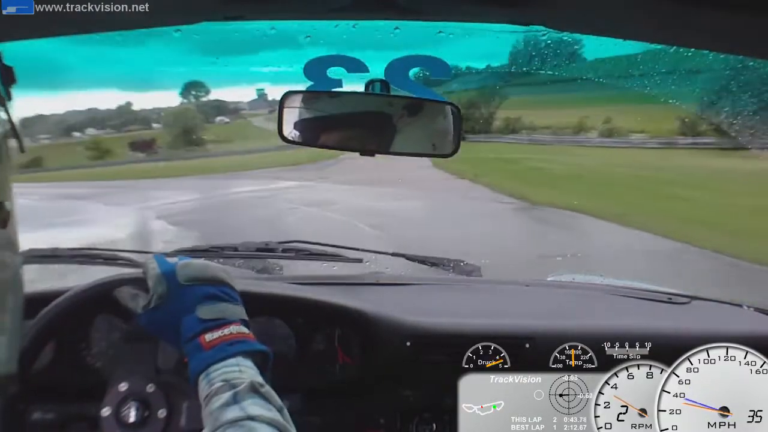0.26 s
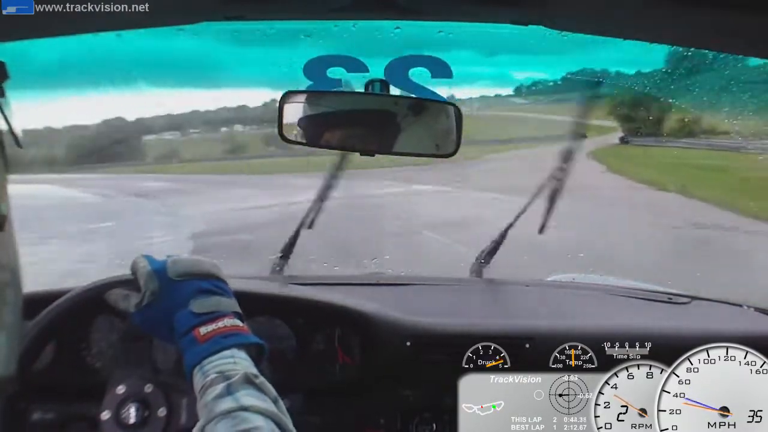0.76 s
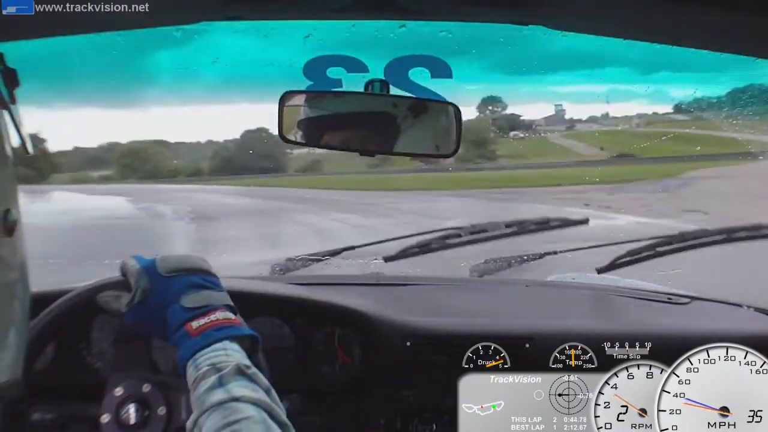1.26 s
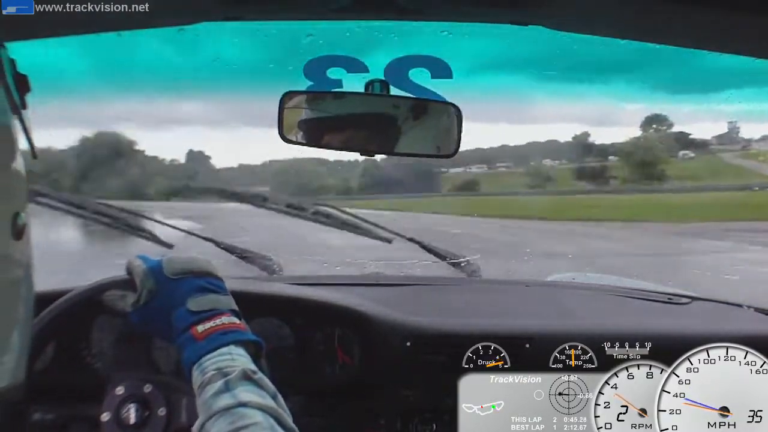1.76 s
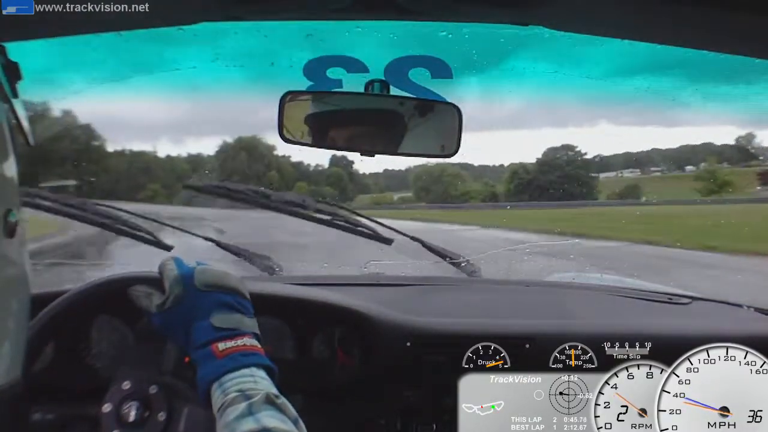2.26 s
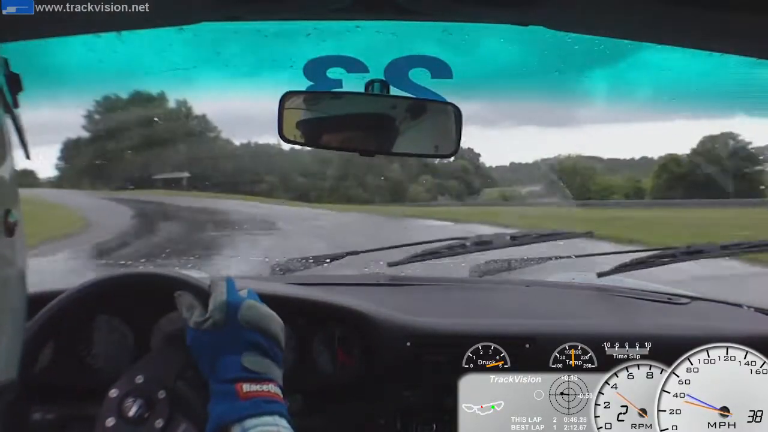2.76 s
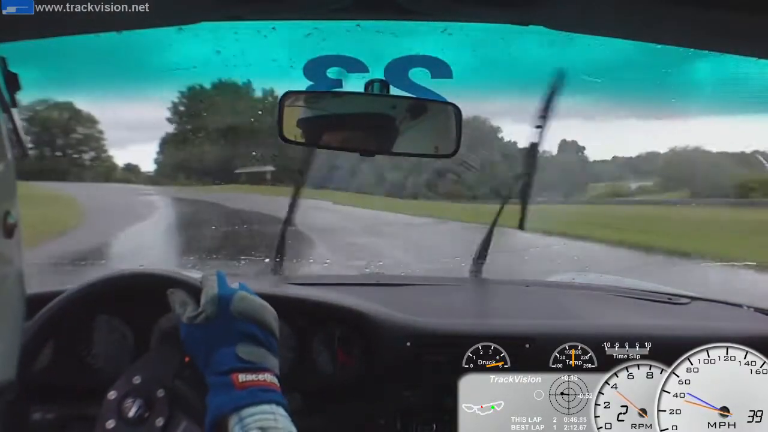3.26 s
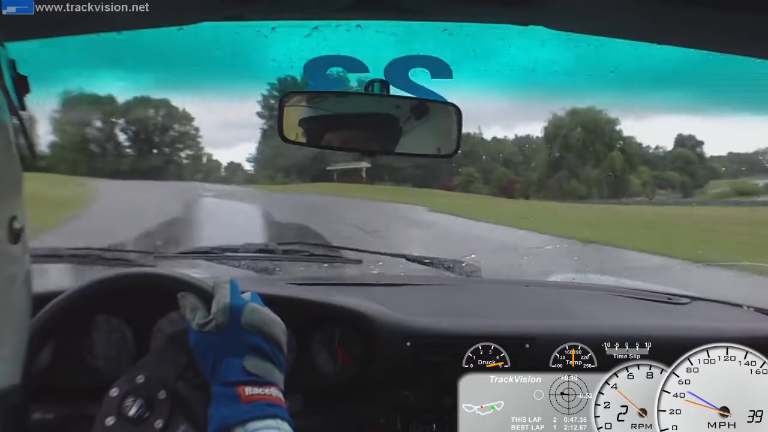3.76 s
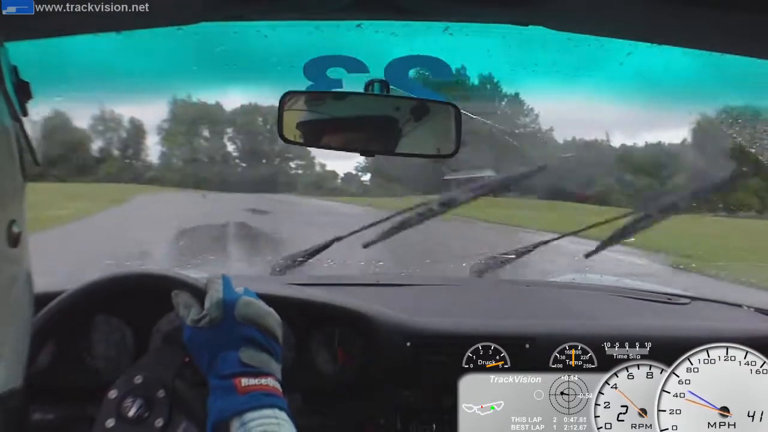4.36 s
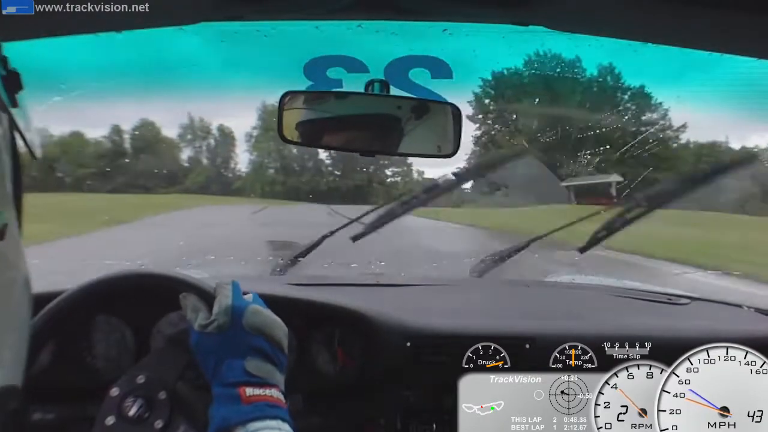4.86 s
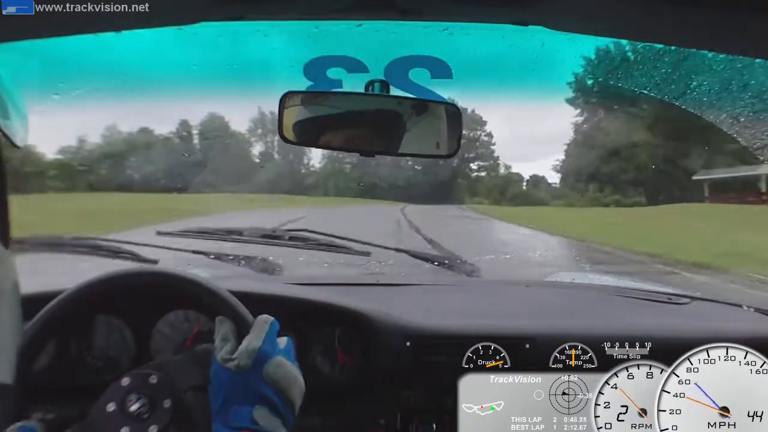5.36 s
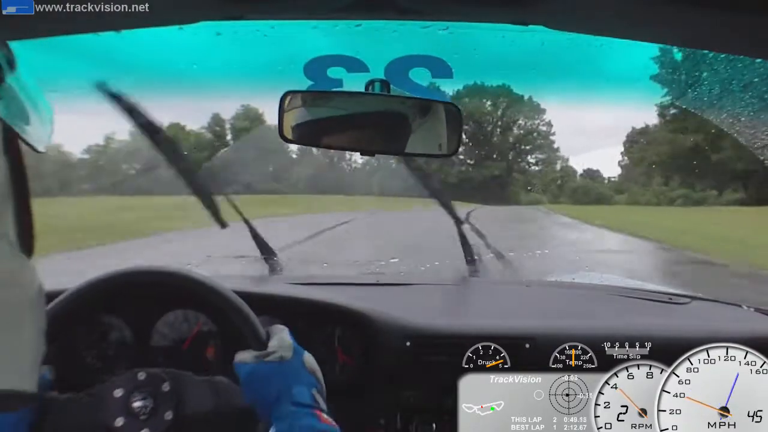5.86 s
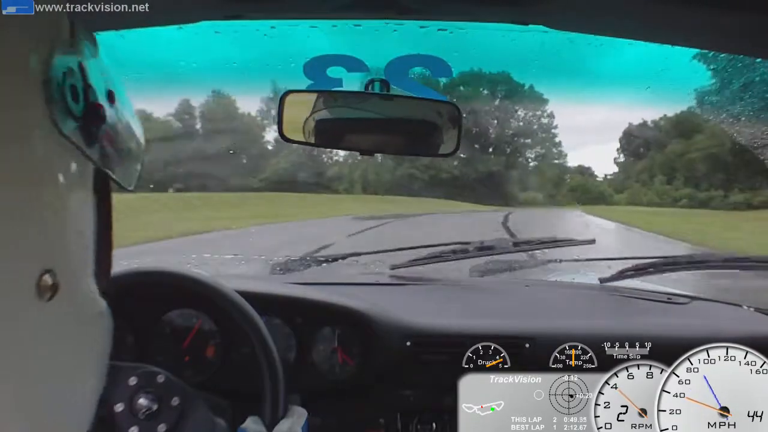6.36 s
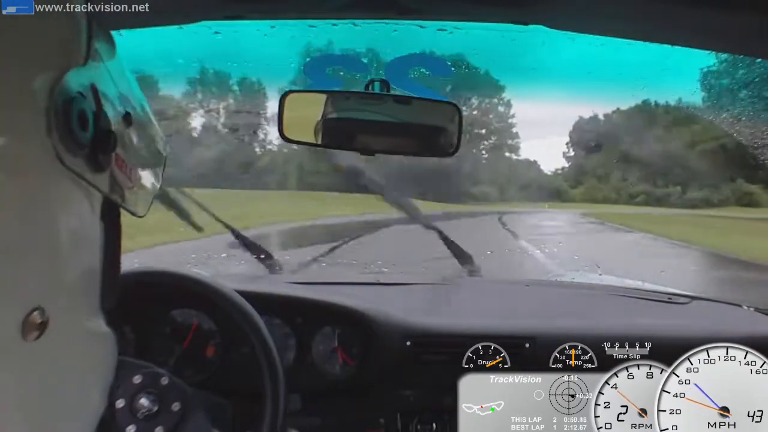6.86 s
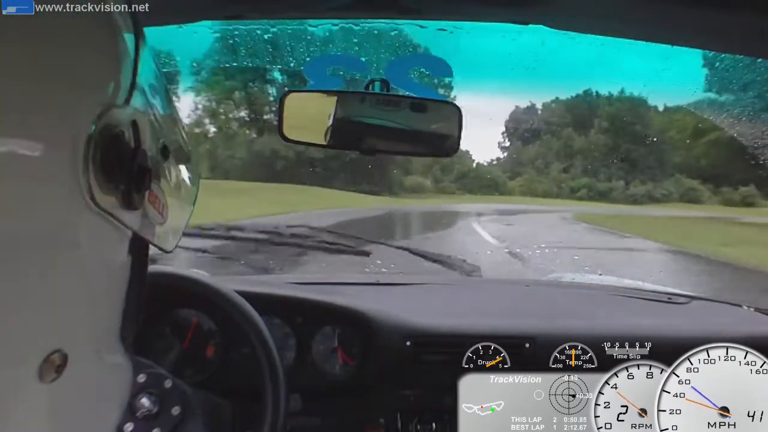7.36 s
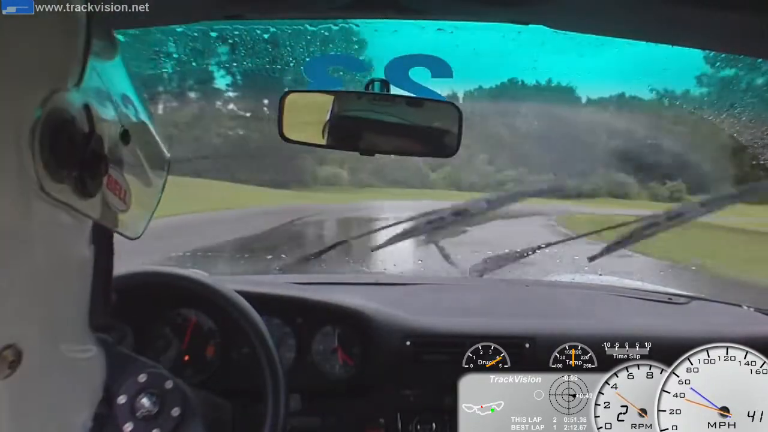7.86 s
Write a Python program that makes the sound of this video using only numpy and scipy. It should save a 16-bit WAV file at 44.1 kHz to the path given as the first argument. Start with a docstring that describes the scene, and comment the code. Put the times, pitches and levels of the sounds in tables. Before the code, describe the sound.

A six-cylinder sports car engine drones and growls behind the seats, heard from inside a bare cabin on a wet track. It rises slowly in pitch for over five seconds, rasps briefly under full throttle, then sinks as the driver lifts off. A gear whine follows the revs. Tyre roar, low rumble and spray hiss swell with each bump, among rattling trim, dull knocks and sharp ticks.

```python
"""A six-cylinder engine drones and growls behind the seats of a bare cabin on a wet, bumpy track.
Its orders, harmonics of the crank rotation, force the body shell and swell as they cross its
resonances; a gear whines on order 28. Tyre roar, spray and loose trim rise with the jolts of
the car, among sharp ticks, dull knocks and one squeak."""
import sys
import numpy as np
from scipy import signal
from scipy.io import wavfile
from scipy.ndimage import uniform_filter1d

SR = 44100
rng = np.random.default_rng(int(sys.argv[2]) if len(sys.argv) > 2 else 0)


def to_wav(s):
    """Save 16-bit WAV."""
    ch = np.atleast_2d(s).T  # columns
    pcm = np.round(np.clip(ch, -1, 1) * 32767)  # PCM
    wavfile.write(sys.argv[1], SR, pcm.astype(np.int16))


N = 358533

# Each row: order, then its level in dB when coasting, at half throttle and wide open.
ORDER_LEVELS = [(2.0, -48.5, -70, -56.5), (4.0, -40.5, -64.5, -55), (5.0, -54.5, -51.5, -60),
                (6.0, -63, -47, -47.5), (7.0, -48, -48, -86.5), (8.0, -63.5, -63, -52.5),
                (9.0, -46.5, -49, -43.5), (10.0, -55.5, -54.5, -74), (11.0, -56.5, -48, -84),
                (12.0, -42.5, -57.5, -38.5), (13.0, -51, -56, -57), (14.0, -55.5, -51.5, -51),
                (15.0, -55.5, -46.5, -77.5), (16.0, -72, -52.5, -45), (17.0, -65.5, -48.5, -43),
                (18.0, -53.5, -59, -69), (19.0, -63.5, -50, -59.5), (20.0, -55, -54, -53.5),
                (21.0, -58, -49.5, -61.5), (22.0, -51, -48.5, -76), (23.0, -65, -54, -46),
                (24.0, -53.5, -63, -57), (25.0, -78, -54, -55.5), (26.0, -82, -55.5, -48),
                (27.0, -60.5, -50, -55.5), (29.0, -83.5, -55.5, -58), (30.0, -52.5, -49, -51),
                (31.0, -59, -60, -58), (32.0, -59.5, -57.5, -50.6), (33.0, -61, -65, -78),
                (34.0, -68, -48, -67), (35.0, -65.5, -54.5, -74.5), (36.0, -60.5, -56.5, -49),
                (37.0, -57.5, -67, -55), (38.0, -67.5, -60, -71.5), (39.0, -83, -61.5, -83),
                (40.0, -60.5, -64, -64), (41.0, -81, -61, -53.5), (42.0, -60, -59.5, -59),
                (43.0, -68, -63, -56), (44.0, -66.5, -60.5, -70.5), (45.0, -70, -62, -49),
                (46.0, -69.5, -66.5, -54.5), (47.0, -68, -57, -60.5), (48.0, -56, -73, -51),
                (49.0, -58, -57.5, -48.5), (50.0, -58, -62, -78), (51.0, -66, -67, -60.5),
                (52.0, -62.5, -67.5, -80.5), (53.0, -56.5, -71, -62.5), (54.0, -78, -59.5, -73),
                (55.0, -63, -61.5, -72), (56.0, -60.5, -64.5, -61.5)]
# Each row: time in seconds, extra level of the growl orders in dB.
GROWL_BOOST = [(2.2, -3), (3.0, 0), (3.6, 2), (3.9, 2.5), (4.4, -3.5), (4.8, -3), (4.93, 1), (5.2, 2),
               (5.45, -2), (5.7, 3.5), (5.9, 3), (6.1, 1)]

def crank_orders(hz, angle, throttle, in_step, unsteadiness):
    """Superposition: in step, the growl orders pulse once a turn and the rasp orders twice."""
    count = len(ORDER_LEVELS)
    phases = rng.uniform(-np.pi, np.pi, count)
    swings, lags = drift(1.9, count), drift(12, count)
    boost = gain_of(columns(GROWL_BOOST)[0])
    rasp_turns = np.array([0.41, 0.75])  # the two firings between growl pulses
    hum, upper = np.zeros(N), np.zeros(N)
    for (order, *levels_db), phase, swing, lag in zip(ORDER_LEVELS, phases, swings, lags):
        growls, rasps = 13 <= order <= 19, 22 <= order <= 27
        level_db = np.interp(throttle, (0, 0.5, 1), levels_db) + 0.66 * unsteadiness * swing
        level = gain_of(level_db) * boost ** growls * shell_along(order * hz)
        rasp_phase = rasps * np.angle(np.exp(-2j * np.pi * order * rasp_turns).sum())
        loose = 1 - in_step * (0.97 * growls + 0.85 * rasps)
        tone = level * np.sin(order * angle + loose * (phase + 0.13 * lag) + rasp_phase)
        if order < 13:
            hum += tone
        else:
            upper += tone
    return hum, upper


# Each row: time in seconds, crank speed in turns a second.
CRANK_SPEED = [(0.0, 27.8), (0.3, 28.16), (0.6, 28.68), (1.0, 29.33), (1.4, 29.82), (1.7, 30.16),
               (2.0, 30.77), (2.4, 31.67), (2.8, 32.37), (3.2, 33.07), (3.6, 33.79), (4.0, 34.55),
               (4.3, 35.22), (4.6, 35.82), (4.85, 36.21), (5.1, 36.98), (5.3, 37.32), (5.5, 37.46),
               (5.7, 37.41), (5.85, 37.24), (6.0, 37.24), (6.15, 36.55), (6.3, 36.14), (6.5, 35.69),
               (6.8, 34.71), (7.1, 33.78), (7.4, 33.05), (7.7, 32.35), (7.9, 32.28), (8.13, 31.4)]
# Each row: time in seconds, gain of the orders in dB, throttle from 0 to 1, firing boom in dB.
ENGINE_LOAD = [(0.0, -13.5, 0, -67), (0.5, -7.5, 0.0, -58), (1.0, -1, 0.49, -51.5), (1.3, -2, 0.5, -73),
               (1.5, -0.8, 0.47, -46.5), (2.2, -2.5, 0.34, -46.0), (2.9, -3, 0.51, -45.5),
               (3.3, -2.5, 0.36, -46), (3.7, 3, 0.28, -46.5), (4.05, 3, 0.17, -47.0), (4.4, 1.5, 0.27, -46),
               (4.8, 1.2, 0.73, -46), (4.92, 0.5, 0.54, -46.5), (5.3, 3.5, 0.62, -46.5),
               (5.75, 0.5, 0.92, -53.5), (6.0, -4, 1.0, -50), (6.2, 3, 0.09, -45), (6.55, -4, 0.22, -44),
               (7.0, -3.5, 0.1, -44.5), (7.3, -5.5, 0.02, -44.5), (7.5, -1.5, 0.07, -51.5),
               (8.13, -1, 0.17, -62)]

def engine(jolt_db):
    """Forced vibration: three firings a turn drive the shell through the engine mounts."""
    hz, = columns(CRANK_SPEED)
    load_db, throttle, boom_db = columns(ENGINE_LOAD)
    angle = 2 * np.pi * (0.5 + np.cumsum(hz) / SR)
    in_step = np.interp(hz, (35.8, 36.4), (0, 1)) * np.minimum(2 * throttle, 1)  # pulling at high revs
    unsteadiness = 1.5 - 0.59 * in_step
    hum, upper = crank_orders(hz, angle, throttle, in_step, unsteadiness)
    whine = gear_whine(hz, angle)
    boom_swing, burn_swing = drift(19, count=2)
    boom = gain_of(boom_db + 2.2 * boom_swing) * np.sin(3 * angle)
    # a four-stroke repeats every second turn, and no two burns are alike
    upper *= 1 + (0.14 + 0.043 * in_step) * np.cos(angle / 2)
    upper *= gain_of(0.69 * unsteadiness * burn_swing)
    # jolts press the mounts, so more gets through; hum and whine feel it less
    shake = gain_of(0.79 * (jolt_db - uniform_filter1d(jolt_db, size=SR // 2)))
    orders = gain_of(load_db) * (upper * shake + hum * shake ** 0.86)
    return np.sqrt(2) * (orders + whine * np.sqrt(shake) + boom)


# Each row: time in seconds, whine level fed into the shell in dB.
TOOTH_LOAD = [(0.0, -46), (0.4, -51), (0.58, -46), (0.75, -40.5), (1.1, -44), (1.6, -40.5), (2.0, -42),
              (2.35, -45), (2.6, -48.5), (2.85, -48), (3.1, -44.5), (3.3, -46), (3.5, -48.5), (3.9, -49),
              (4.2, -52.5), (4.5, -52), (4.8, -52), (5.1, -42), (5.4, -45), (5.75, -45), (6.0, -46),
              (6.3, -60), (6.6, -48), (6.9, -50), (7.2, -45), (7.5, -58), (7.8, -58), (8.13, -43)]

def gear_whine(hz, angle, order=28):
    """Gear meshing: periodic tooth contact gives a tone, louder as the teeth bear harder."""
    swing, lag = drift(19, count=2)
    level = gain_of(columns(TOOTH_LOAD)[0] + 1.2 * swing) * shell_along(order * hz)
    return level * np.sin(order * angle + 0.15 * lag)


# Each row: resonance frequency in Hz, width in Hz, peak gain in dB.
SHELL_MODES = [(123.7, 11, -1), (214, 15.8, -1), (319.7, 50, -1.6), (458, 13, 1), (513, 56, 0.7),
               (560.8, 17.8, 9.5), (584.6, 13, -1.5), (603.4, 12, 8), (621.4, 33, 5), (668.2, 33, 10),
               (697.6, 24, 3.5), (751, 55, 0.5), (828.4, 41, 0.5), (884.3, 64, 6), (931.5, 16, 7.5),
               (970.6, 34.7, 10), (1035, 86, 2.5), (1177, 77, 2), (1290, 56, 0), (1346, 27, 7),
               (1394, 57, 8.5), (1493, 41, 8), (1607, 48.2, 5), (1684, 85, 3.5)]

def shell(hz, valley_db=-10):
    """Resonance: the modes of shell and cabin air add in power over a flat valley."""
    peaks = sum(gain_of(db) ** 2 / (1 + (2 * (hz - f) / width) ** 4) for f, width, db in SHELL_MODES)
    return np.sqrt(peaks + gain_of(valley_db) ** 2)


def shell_along(hz):
    """Frequency response: the shell's gain along the path of a gliding tone."""
    grid_hz = np.arange(2500.)
    return np.interp(hz, grid_hz, shell(grid_hz))


# Each row: time in seconds, road level between bumps in dB, relative roar and rumble in dB.
ROAD_LEVELS = [(0.0, -46.5, -0.5, 2.5), (0.5, -51.5, -2.5, 0), (0.9, -51.5, -3.5, 0.5), (1.5, -48, -2.5, 1),
               (2.4, -52.5, -3, -4), (2.85, -51, -4, -1.5), (2.98, -51, -1.5, -3), (3.1, -52, -3, 0),
               (3.6, -50.5, -2, -4), (4.1, -51, -3, -3.5), (4.7, -48, -0.5, -0.5), (5.05, -48.5, -2, -6),
               (5.4, -48, -1, -1), (5.8, -46.5, -2, -2.5), (6.1, -48, -5, -1), (6.9, -52.5, -5, -3),
               (7.28, -48, 3, 4.5), (7.4, -53.5, -7, 1), (7.52, -49, -0.5, 0.5), (8.13, -51, -2.5, 2.5)]
# Tyre roar, rumble and spray. Each row: frequency in Hz, relative spectral density in dB.
ROAR_SPECTRUM = [(150, -22.5), (260, -9), (400, -3.5), (520, -6), (640, -6.5), (800, -1.5), (980, -4.5),
                 (1100, -3), (1220, -7.5), (1400, -8), (1650, -9), (2100, -17.5), (3000, -45.5)]
RUMBLE_SPECTRUM = [(12, -32), (25, -0.5), (45, -4.5), (70, -1.5), (130, -5.5), (170, -6), (225, -3),
                   (265, -5.5), (320, -5), (500, -60.5)]
HISS_SPECTRUM = [(900, -29), (1800, 4.5), (2050, -6), (2300, 0.5), (2600, -7), (2990, -1), (3600, -8.5),
                 (5000, -13), (5700, -9.5), (6800, -14.5), (7200, -32)]

def road(hiss_rise_db, roar_rise_db):
    """Random excitation: tyres and spray make broadband noise that swells over the bumps."""
    level_db, roar_db, rumble_db = columns(ROAD_LEVELS)
    roar = noise(ROAR_SPECTRUM, size=2048, patchy_db=1.4, shell_share=0.47)
    roar *= gain_of(12.5 + roar_db + roar_rise_db)
    rumble = noise(RUMBLE_SPECTRUM, size=4096, patchy_db=1.5, shell_share=0.069)
    rumble *= gain_of(2 + rumble_db + 0.99 * hiss_rise_db)
    spray = noise(HISS_SPECTRUM, size=256, patchy_db=1.5, shell_share=0)
    treble = gain_of(hiss_rise_db) * (spray + gain_of(-9.5) * rattle(HISS_SPECTRUM))
    return gain_of(level_db) * (roar + rumble + treble)


def rattle(spectrum, per_s=400, spread_db=3, ring_cycles=14, pitches=24):
    """Damped free vibration: loose trim and grit, struck at random, ring briefly at many pitches."""
    strength = gain_of(spread_db * np.minimum(rng.exponential(1, N), 5))
    strikes = strength * (rng.random(N) < per_s / SR)
    part = rng.integers(0, pitches, N)
    t, out = np.arange(800) / SR, np.zeros(N)
    for k, hz in enumerate(np.geomspace(1300, 7000, pitches)):
        ring = gain_of(level_at(spectrum, hz) - 60 * t * hz / ring_cycles) * np.sin(2 * np.pi * hz * t)
        out += signal.oaconvolve(strikes * (part == k), ring)[:N]
    return unit_rms(out)


# Each row: centre in seconds, length in seconds, rise of hiss in dB, rise of roar in dB.
TRACK_BUMPS = [(0.021, 0.01, 6.5, 6.5), (0.219, 0.025, 5.5, 0.5), (0.338, 0.034, 3.5, 4),
               (0.408, 0.055, 5, 6.5), (0.548, 0.076, 4.8, 6.5), (0.788, 0.02, 3, 7), (0.814, 0.02, 2.5, 5),
               (0.926, 0.045, 4, 5.5), (1.053, 0.048, 4.5, 5), (1.147, 0.06, 5.5, 6.5),
               (1.271, 0.045, 5, 7), (1.344, 0.011, 4.5, 6), (1.375, 0.03, 3.5, 2), (1.453, 0.033, 5.5, 6),
               (1.507, 0.071, 4, 3.5), (1.801, 0.03, 1.5, 5.5), (2.082, 0.062, 3, 4), (2.214, 0.067, 1, 3),
               (2.331, 0.038, 2, 5.5), (2.588, 0.027, 2.5, 4), (2.664, 0.048, 4.5, 5),
               (2.974, 0.056, -3.5, -7.5), (3.196, 0.16, 1.5, 4), (3.386, 0.091, 1.5, 4),
               (3.578, 0.034, 4, 3.5), (3.726, 0.077, 2, 5), (3.799, 0.045, 7.5, 7), (3.919, 0.095, 6, 6.5),
               (3.997, 0.055, 4.5, 5), (4.141, 0.051, 5, 8), (4.2, 0.045, 4, 8), (4.31, 0.025, 4.5, 5.5),
               (4.42, 0.045, 3, 4), (4.462, 0.03, -3, -3), (4.502, 0.039, 3, 0.5), (4.608, 0.023, 0, 0.5),
               (4.706, 0.035, 5.5, 4.5), (4.762, 0.038, 4.5, 2.5), (4.935, 0.067, 1, 4.5),
               (5.075, 0.19, 2, 3.5), (5.567, 0.026, 4, 5.5), (5.753, 0.028, 4, 3), (5.896, 0.07, 5.5, 7.5),
               (6.048, 0.027, 2.5, 7.5), (6.142, 0.024, 5, 3.5), (6.324, 0.03, 6, 8), (6.583, 0.084, 6, 5),
               (6.73, 0.17, 2, 3.5), (7, 0.019, 4, 6.5), (7.244, 0.14, -1, -3), (7.319, 0.019, 2, 3),
               (7.542, 0.15, 2.5, 1), (7.792, 0.15, 3, 2.5), (8.035, 0.089, 3.5, 5.5)]

def bumps(rebound=0.28, rebound_width=2.67):
    """Amplitude modulation: each bump is a bell-shaped rise inside a lull as the body unloads."""
    t = np.arange(0, N, 256) / SR
    centre, length, hiss_db, roar_db = np.transpose(TRACK_BUMPS)
    away = np.log(16) * ((t[:, None] - centre) / length) ** 2
    bell = (1 + rebound) * np.exp(-away) - rebound * np.exp(-away / rebound_width ** 2)
    ripple_db = 0.97 * drift(16, count=1)[0]  # small unevenness of the tarmac
    return [np.interp(np.arange(N) / SR, t, bell @ db) + ripple_db for db in (hiss_db, roar_db)]


# Grit and trim ticks, shell knocks, a trim or wiper squeak. Each row: start in seconds, peak in dB.
GRIT_TICKS = [(0.3112, -40), (0.4, -40), (0.5926, -42), (1.1292, -43), (1.8723, -43), (2.0517, -48.5),
              (2.1166, -43), (2.2785, -49), (3.1414, -41), (3.2267, -42), (3.4617, -44), (4.3155, -44),
              (6.2564, -47), (6.3203, -39), (6.8857, -47), (7.1428, -56), (7.269, -42), (7.303, -46),
              (7.696, -47.5), (7.8352, -43), (7.9744, -49)]
SHELL_KNOCKS = [(0.543, -27), (0.667, -24.5), (0.85, -27), (0.917, -30), (1.099, -24.5), (1.27, -24),
                (1.376, -23), (2.014, -33), (2.523, -46), (2.586, -23), (3.499, -40), (3.794, -24),
                (3.885, -28), (4.196, -24), (4.312, -35), (4.48, -25), (4.703, -36), (5.735, -19),
                (5.869, -30), (6.044, -34), (6.134, -31), (6.321, -39), (6.758, -36), (8.03, -24.5)]
TRIM_SQUEAK = [(1.127, -39.5)]

def transients(events, band_hz, t60, rise_s):
    """Damping: each brief excitation leaves a burst of band noise that decays exponentially."""
    t = np.arange(2600) / SR
    out = np.zeros(N + len(t))
    band = signal.butter(3, band_hz, "bandpass", fs=SR, output="sos")
    envelope = (1 - np.exp(-t / rise_s)) * gain_of(-60 * t / t60)
    for start, peak_db in events:
        burst = signal.sosfilt(band, envelope * rng.standard_normal(len(t)))
        out[round(start * SR):][:len(t)] += gain_of(peak_db) * burst / abs(burst).max()
    return out[:N]


def noise(spectrum, size, patchy_db, shell_share):
    """Spectral shaping: noise with drifting patches, partly coloured by the shell."""
    frames, hz = 4 * N // size + 5, np.fft.rfftfreq(size, 1 / SR)
    real, imag, patches = rng.standard_normal((frames, len(hz), 3)).T
    patches = unit_rms(uniform_filter1d(uniform_filter1d(patches, size=10, axis=0), size=8, axis=1))
    colour = gain_of(level_at(spectrum, hz)) * shell(hz) ** shell_share
    spectra = (real + 1j * imag) * colour[:, None] * gain_of(patchy_db * patches)
    return unit_rms(signal.istft(spectra, nperseg=size, noverlap=3 * size // 4)[1][:N])


def drift(hz, count, knots_per_s=40):
    """Low-pass noise: random curves of rms near 1 that wander at rates up to hz."""
    knots = rng.standard_normal((count, int(N / SR * knots_per_s) + 2))
    smooth = signal.sosfilt(signal.butter(2, hz, fs=knots_per_s, output="sos"), knots)
    position = np.arange(N) / SR * knots_per_s
    return [np.interp(position, np.arange(len(row)), unit_rms(row)) for row in smooth]


def columns(table):
    """Linear interpolation of each column over time, one value a sample."""
    times, *values = np.transpose(table)
    return [np.interp(np.arange(N) / SR, times, v) for v in values]


def level_at(spectrum, hz):
    """Interpolation of a spectrum in dB over log frequency."""
    f, db = np.transpose(spectrum)
    return np.interp(np.log(hz + 1), np.log(f + 1), db)


def gain_of(db):
    """Decibels to an amplitude ratio."""
    return 10 ** (np.asarray(db) / 20)


def unit_rms(x):
    """Normalisation to rms 1."""
    return x / np.sqrt(np.mean(x ** 2) + 1e-20)


def scene():
    """Superposition: engine, road and transients add at one point in the cabin."""
    hiss_rise_db, roar_rise_db = bumps()
    ticks = transients(GRIT_TICKS, band_hz=(1500, 6500), t60=0.033, rise_s=0.0017)
    knocks = transients(SHELL_KNOCKS, band_hz=(500, 1130), t60=0.026, rise_s=0.00059)
    squeak = transients(TRIM_SQUEAK, band_hz=(5300, 6900), t60=0.071, rise_s=0.004)
    return (engine(roar_rise_db) + road(hiss_rise_db, roar_rise_db) + ticks + knocks + squeak)[None]


def record(dry, cutoff_hz=7220):
    """Band limiting: a steep low-pass, over a faint electronic hiss."""
    lowpass = signal.firwin(1023, cutoff_hz, window=("kaiser", 10), fs=SR)
    return signal.oaconvolve(dry, lowpass[None], "same") + gain_of(-101) * rng.standard_normal(dry.shape)


dry = scene()
out = record(dry)
to_wav(out)
```